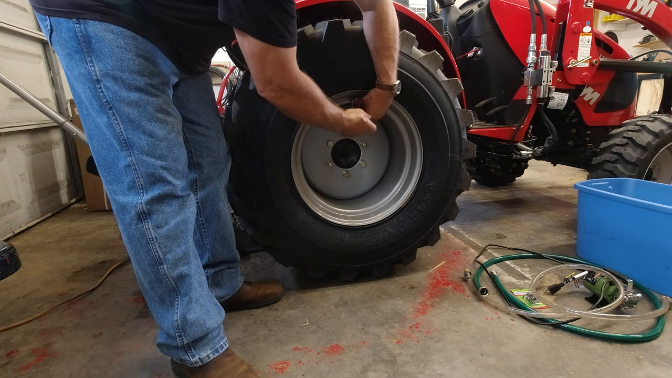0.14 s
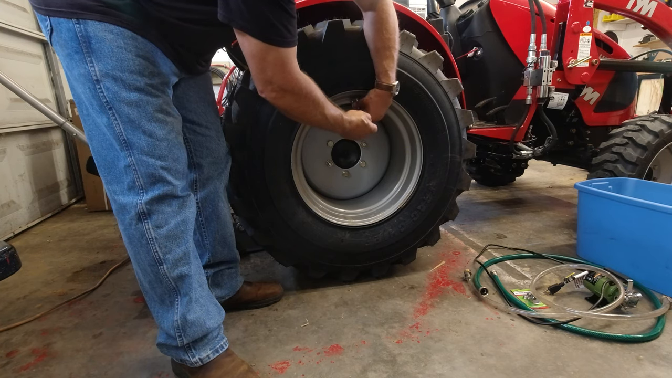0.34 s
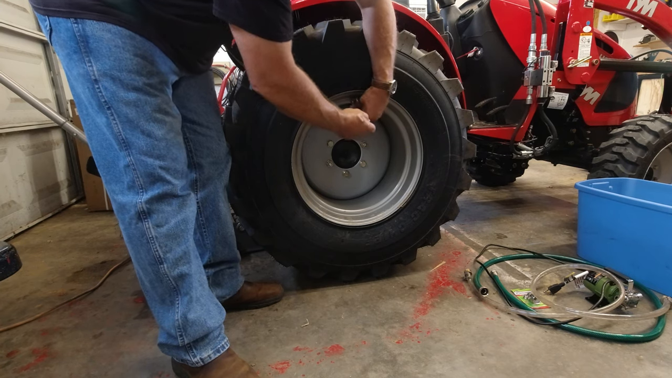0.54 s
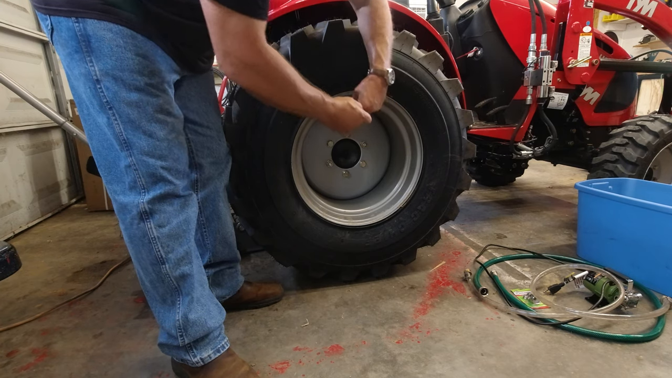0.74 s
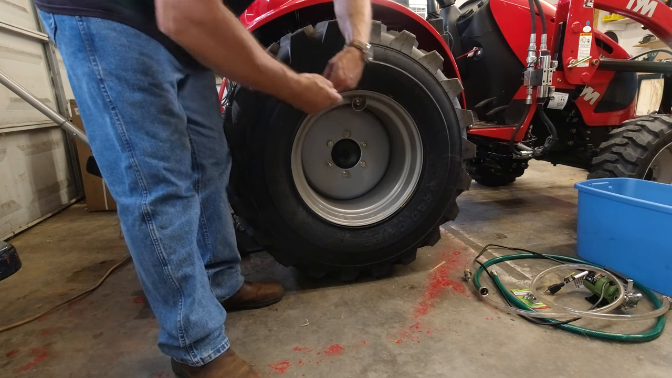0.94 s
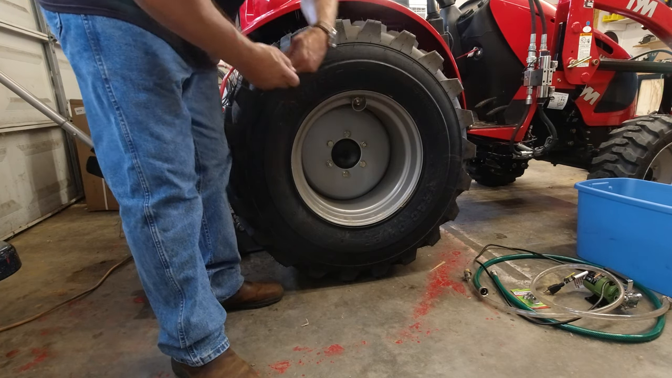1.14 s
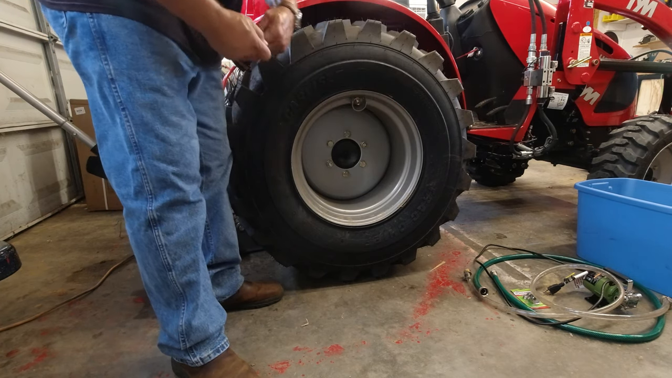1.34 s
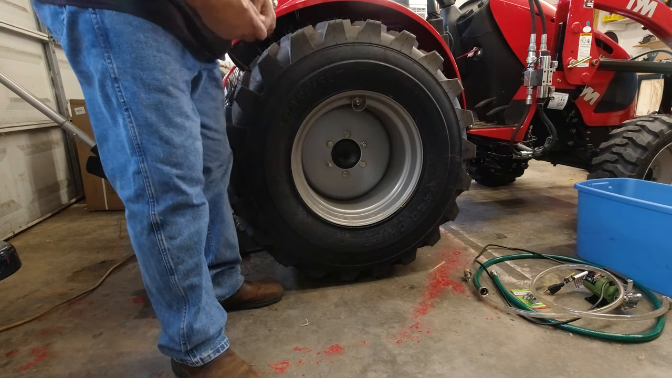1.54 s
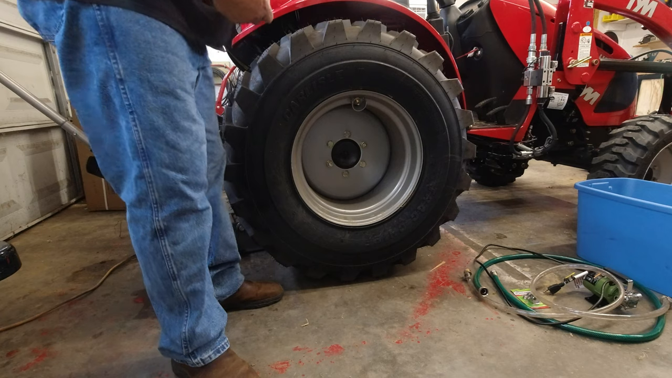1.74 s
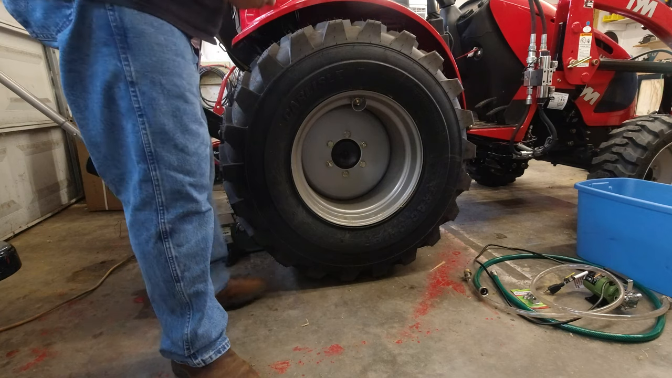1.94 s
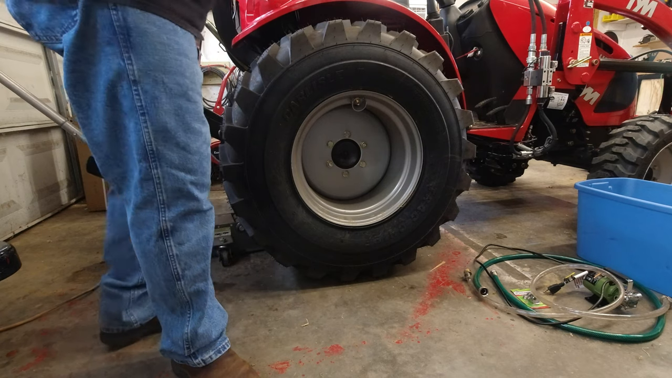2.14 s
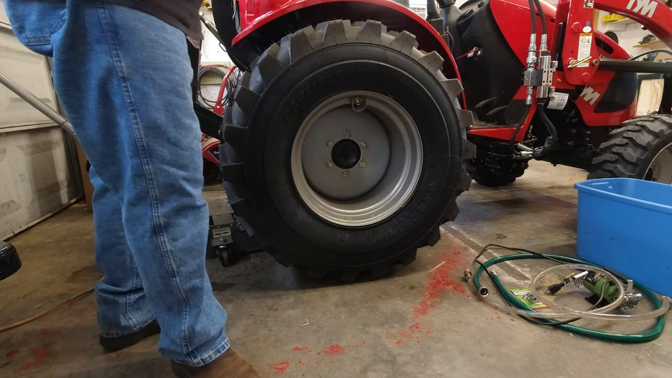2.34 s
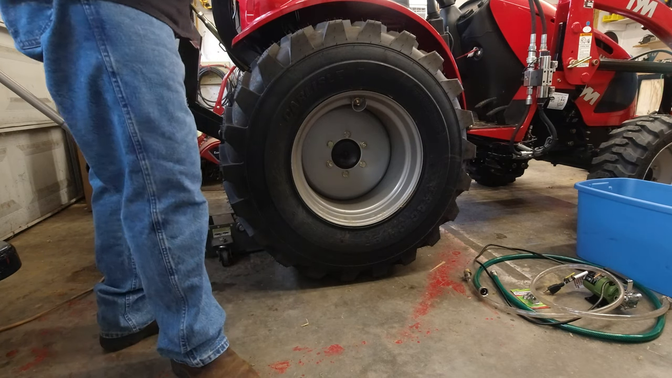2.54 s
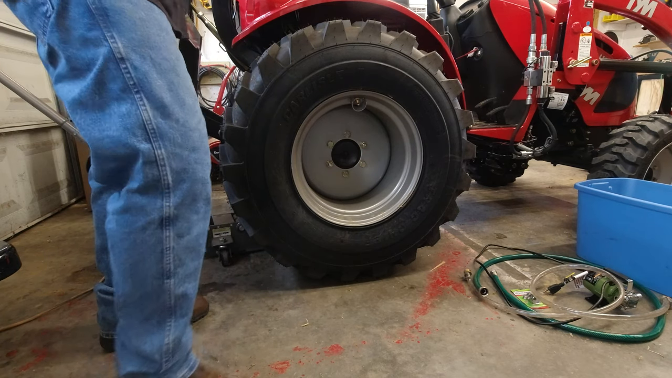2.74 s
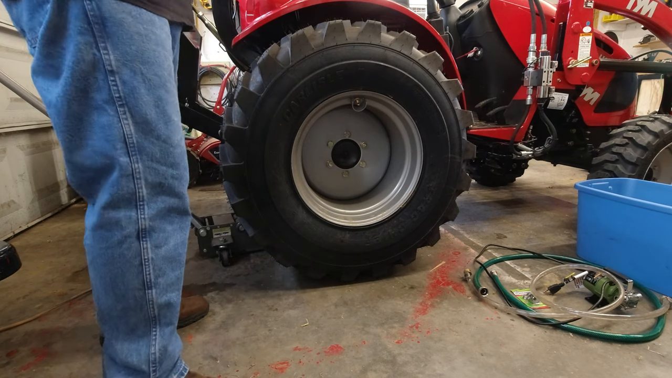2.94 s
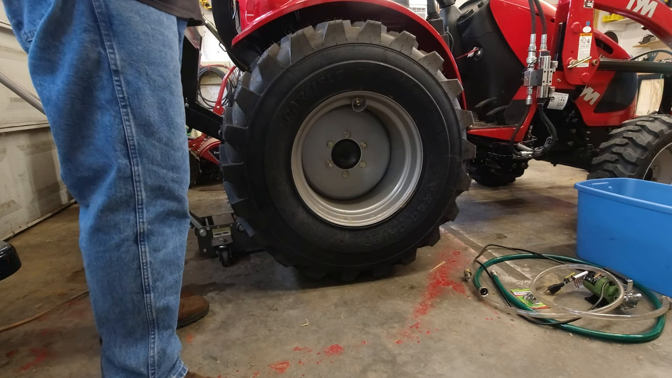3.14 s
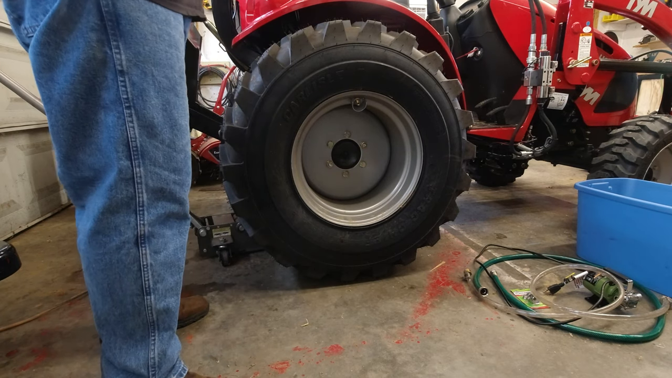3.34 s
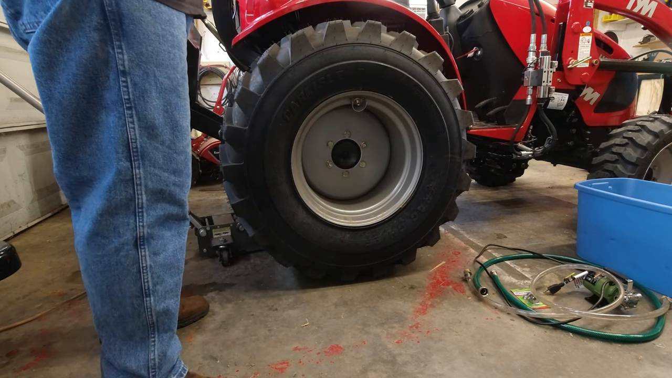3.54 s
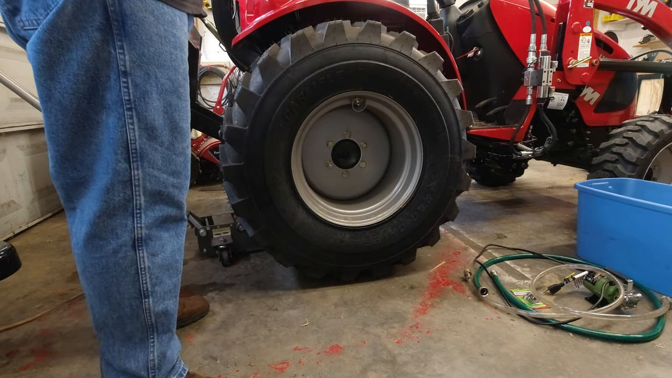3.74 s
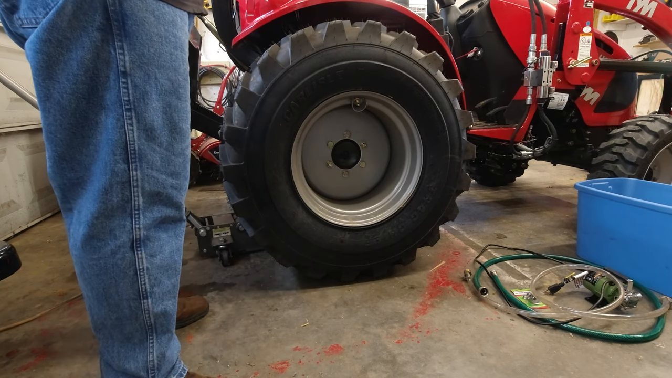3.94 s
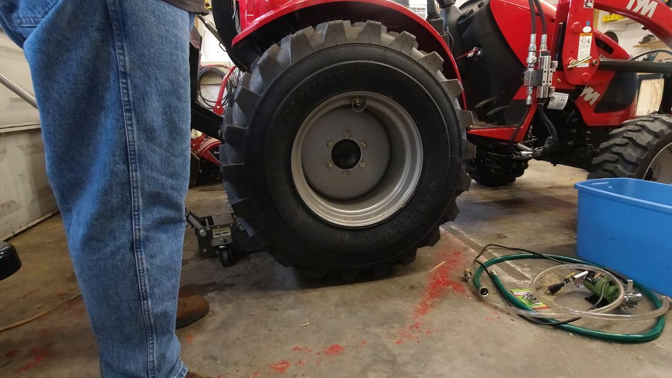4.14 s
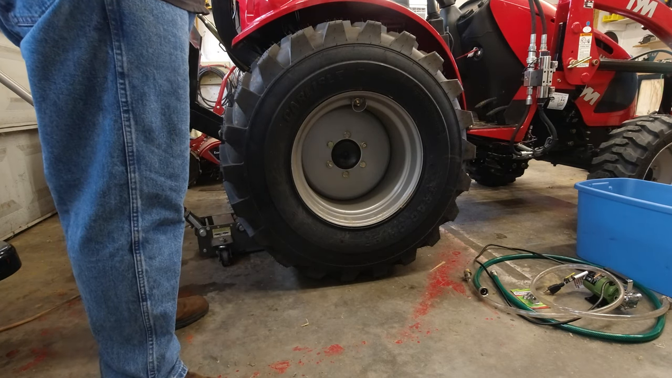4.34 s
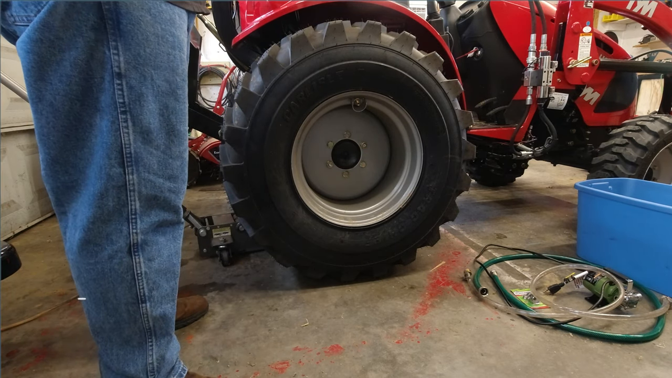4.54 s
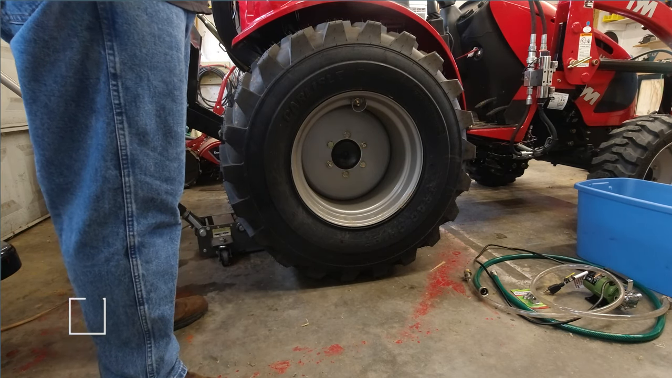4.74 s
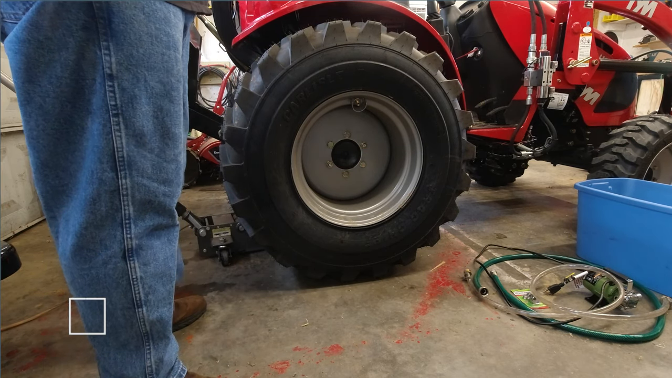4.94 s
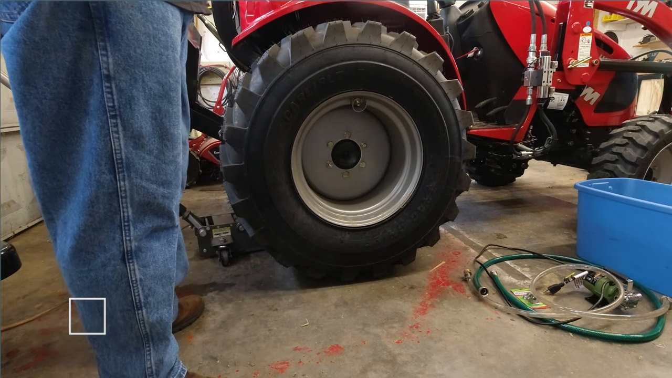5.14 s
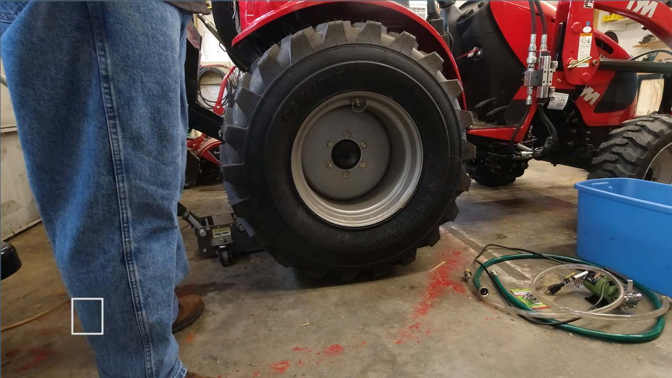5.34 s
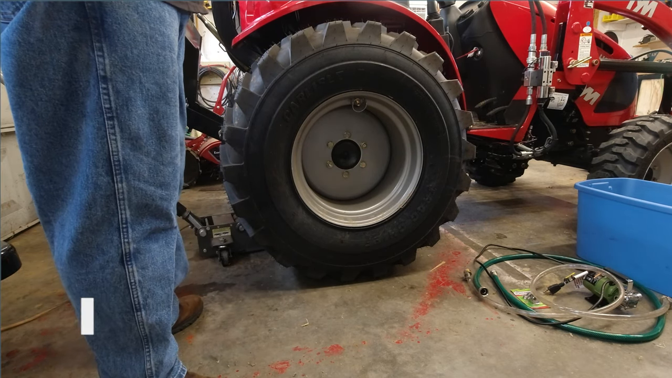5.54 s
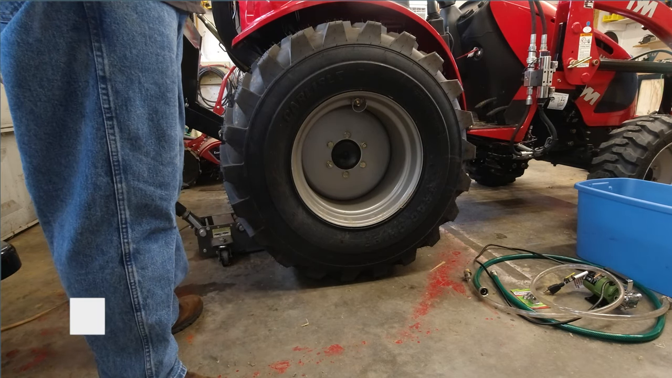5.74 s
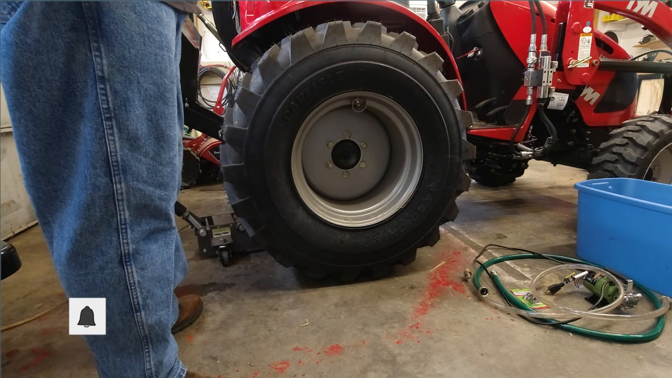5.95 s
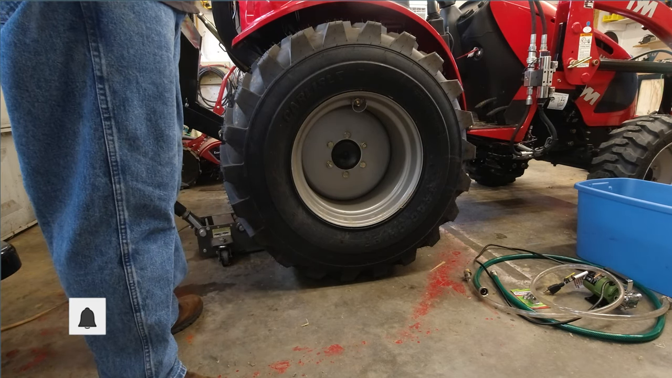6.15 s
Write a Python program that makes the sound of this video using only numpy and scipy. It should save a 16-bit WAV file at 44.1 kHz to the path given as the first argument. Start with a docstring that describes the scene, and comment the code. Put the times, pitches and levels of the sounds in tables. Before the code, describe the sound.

Air seeps faintly for a moment, then rushes out of a big tyre's open valve in a long, loud, metallic-tinged hiss.

```python
"""Tractor tyre let down in a garage

Close by the valve, air seeps past the loosened core between the fingers, a thin hiss of coloured noise.
The core comes out and a full jet hisses from the stem, coloured by the steel rim, and slowly weakens.
The jet's ultrasound overloads each microphone of the pair: a low noise rush that fades faster than the hiss.
Behind it lies the faint noise of the still garage."""
import sys
import numpy as np
from scipy import signal
from scipy.fft import rfft, irfft
from scipy.io import wavfile

SR = 44100
rng = np.random.default_rng(int(sys.argv[2]) if len(sys.argv) > 2 else 0)


def file_out(sig):
    """Save sig as 16-bit WAV at sys.argv[1]."""
    # one column per channel
    cols = np.atleast_2d(sig).T
    # limit, then scale
    lim = np.clip(cols, -1, 1)
    pcm = np.round(lim * 32767).astype(np.int16)
    wavfile.write(sys.argv[1], SR, pcm)


N = 277592
TIME, FREQS = np.arange(N) / SR, np.fft.rfftfreq(N, 1 / SR)  # s, Hz
CORE_OUT = 0.3876  # when the core leaves the stem (s)
LOW_HZ, FIZZ_HZ = 1300, 6200  # where the low band gives way to hiss, and hiss to fizz


def gain_of(db):
    """Decibels to amplitude."""
    return 10 ** (np.asarray(db) / 20)


def evened(x):
    """Scales to an rms of one."""
    return x / np.sqrt(np.mean(x ** 2) + 1e-20)


def read(points):
    """A table over frequency, joined by straight lines on a log axis."""
    hz, value = np.transpose(points)
    return np.interp(np.log(FREQS + 1), np.log(hz + 1), value)


def turbulence(colour_db):
    """Spectrum of coloured eddy noise at two microphones, partly shared."""
    # Likeness of the air's sound at the microphones, long waves reach both alike:
    # (frequency [Hz], left-right correlation [-1 to 1])
    likeness = [(100, .94), (600, 1), (1200, 0.69), (2200, 0.32), (2850, 0.35), (3250, 0.56), (3900, 0.66),
                (4500, 0.31), (5400, 0.72), (6800, 0.68), (7850, 0.15), (8600, 0.39), (10500, 0.46),
                (11900, .68), (15500, 0.49)]
    same = np.clip(read(likeness), -1, 1)
    shared, apart = rfft(rng.standard_normal((2, N)))
    mid = np.sqrt(1 + same) * shared
    side = np.sqrt(1 - same) * apart
    return np.array([mid + side, mid - side]) * gain_of(colour_db)


def garage():
    """The still garage: steady, faint noise, strongest in the bass."""
    # Colour of the room: (frequency [Hz], relative density [dB per Hz])
    room_colour = [(25, 3), (110, 7), (200, -4), (500, -7), (2000, -5), (15000, -20)]
    level_db = -75
    return gain_of(level_db) * evened(irfft(turbulence(read(room_colour)), N))


def ramp(start, length):
    """Goes from zero to one over the given time."""
    return np.clip((TIME - start) / length, 0, 1)


def wander(rate_hz):
    """Random drift of rms one, up to about the given rate."""
    drift = rfft(rng.standard_normal(N)) * (FREQS > 1)
    return evened(irfft(drift / (1 + (FREQS / rate_hz) ** 2), N))


def reflections(wet_db, t60):
    """Response of the direct path plus dying reflections, which ripple the spectrum of a steady hiss."""
    tail = rng.standard_normal(N) * gain_of(-60 * TIME / t60)
    tail = tail * (TIME > 0.002)
    return 1 + gain_of(wet_db) * rfft(tail / np.linalg.norm(tail))


def below(hz):
    """Share of the amplitude that a smooth crossover leaves under hz."""
    return 1 / (1 + (FREQS / hz) ** 8)


def centred(x):
    """Scales a stereo pair so that its middle has an rms of one."""
    return x / np.std(x.mean(0))


def bands(spectrum):
    """Splits a spectrum at the fizz edge into hiss and fizz, each with an rms of one in the middle."""
    hiss_share = below(FIZZ_HZ)
    hiss = centred(irfft(spectrum * hiss_share, N))
    fizz = centred(irfft(spectrum * (1 - hiss_share), N))
    return np.array([hiss, fizz])


def rim_db():
    """The lift that the resonances around the valve give to each frequency of the open jet."""
    # Resonances of the rim dish and the valve: (frequency [Hz], width [Hz], lift [dB])
    resonances = [(2507, 49, 5.5), (2657, 31, 6.5), (2757, 16, 9.5), (3187, 380, 5), (3860, 370, 4.5),
                  (4430, 85, 2.5), (4525, 91, 5.5), (4925, 62, 4.5), (7550, 210, 1), (8400, 91, 2.5),
                  (9960, 200, 1.5), (11150, 250, 0.5)]
    return sum(db / (1 + (2 * (FREQS - hz) / width) ** 2) for hz, width, db in resonances)


def leak():
    """A thin hiss squeezes past the thread of the core and grows as it is turned."""
    # Air squeezing past the core: (frequency [Hz], relative density [dB per Hz])
    leak_colour = [(150, -24), (340, -17), (450, -28), (690, -12), (880, -18.5), (1500, -3.5), (2200, -1),
                   (2750, 1.5), (3350, -3), (3750, 0.5), (4700, 0), (5600, -15.5), (6400, -18),
                   (8400, -18.5), (10000, -15), (12500, -16), (15800, -22)]
    seep_db = -48.5  # hiss past the seated core
    seep_fizz_db, seep_low_db = -7.5, -19  # relative to the hiss
    turn_db, turn_fizz_db = 6, 4.5  # gain of the whole leak, and what the fizz gains on top
    creep_s, creep_db = 0.077, 6

    turned = ramp(0.26, 0.01)  # one turn widens the gap (s, s)
    # On its last thread the core creeps outward: low band and hiss grow, the fizz does not.
    crept = ramp(CORE_OUT - creep_s, creep_s)
    air = turbulence(read(leak_colour) + 0.77 * rim_db())  # the rim lifts the leak less than the jet
    air = air * reflections(wet_db=-5, t60=0.1)
    low_share = below(LOW_HZ)
    low = centred(irfft(air * low_share, N))
    hiss, fizz = bands(air * (1 - low_share))
    body = (low * gain_of(seep_low_db) + hiss) * gain_of(creep_db * crept)
    fizz = fizz * gain_of(seep_fizz_db + turn_fizz_db * turned)
    return (body + fizz) * gain_of(seep_db + turn_db * turned + 0.36 * wander(rate_hz=50))


def surges_db():
    """Lift of the hiss over time: each surge rises quickly and dies away."""
    # The core pops out, the hand sweeps through the jet, a small late surge:
    # (start [s], lift [dB], release [s])
    surges = [(0.387, 2, 0.04), (0.745, 5, 0.095), (4.8, 1.4, 0.2)]
    rise_s = 0.037
    total_db = 0
    for start, lift_db, release in surges:
        fall = np.exp(-np.maximum(TIME - start - rise_s, 0) / release)
        total_db = total_db + lift_db * ramp(start, rise_s) * fall
    return total_db


def sag_db(lost_db, power):
    """The jet weakens ever faster: lost_db is gone 5.62 s after the core came out."""
    return -lost_db * (np.maximum(TIME - CORE_OUT, 0) / 5.62) ** power


def jet():
    """The jet plays on the fingers, then blows free: the stem hisses, the smallest eddies fizz."""
    # The open stem, humped near its quarter-wave and three-quarter-wave resonances:
    # (frequency [Hz], relative density [dB per Hz])
    jet_colour = [(100, -27.5), (700, -19), (1300, -8.5), (2000, 0), (2900, -1.7), (4100, 1.6), (5500, -4),
                  (6900, -8), (8300, -6.5), (10400, -1.5), (11700, -5), (13000, -5.5), (14700, -9.5)]
    # Colour of the jet on the fingers: (frequency [Hz], relative level [dB])
    finger_colour = [(500, 3), (2300, 0.5), (3800, -2.5), (5000, -1.5), (6800, 1), (10000, 3), (12500, 5),
                     (15600, 2.5)]
    hiss_full_db, fizz_full_db = -30.5, -31  # the free jet at full pressure
    fingers_db = -2.4  # how much the fingers damp the hiss

    air = turbulence(read(jet_colour) + rim_db()) * reflections(wet_db=-16.5, t60=0.17)
    free = ramp(0.67, 0.21)  # the fingers leave the jet (s), over this time (s)
    surge = surges_db()
    on_fingers = bands(air * gain_of(read(finger_colour)))
    hiss, fizz = free * bands(air) + (1 - free) * on_fingers
    hiss_db = hiss_full_db + sag_db(2.5, power=2.5) + surge + fingers_db * (1 - free)
    fizz_db = fizz_full_db + sag_db(3, power=4.6) - 0.18 * surge  # fizz dips as the hiss surges
    # Larger eddies waver more, and more slowly.
    hiss = hiss * gain_of(hiss_db + 0.61 * wander(rate_hz=21))
    fizz = fizz * gain_of(fizz_db + 0.37 * wander(rate_hz=44))
    return hiss + fizz


def overload():
    """Ultrasound beats with itself in each microphone; noise stands for the unrelated difference tones."""
    # Difference tones: (frequency [Hz], relative density [dB per Hz])
    rush_colour = [(25, -15), (140, -2.5), (500, -1.8), (1100, -1.3), (2000, 0), (4000, -17), (8000, -15.5),
                   (15000, -23)]
    rush_full_db = -42.3  # the part under LOW_HZ, at full pressure
    beats = rfft(rng.standard_normal((2, N))) * gain_of(read(rush_colour))
    low_rms = np.std(irfft(beats * (FREQS < LOW_HZ), N).mean(0))
    rush_db = rush_full_db + sag_db(8, power=2.28) + 1.23 * wander(rate_hz=9.5)
    return irfft(beats, N) / low_rms * gain_of(rush_db)


def scene():
    """The leak gives way to the jet as the core clears the stem, over the still garage."""
    opened = ramp(CORE_OUT, 0.018)  # time to clear (s)
    return garage() + (1 - opened) * leak() + opened * (jet() + overload())


def record(dry):
    """The recorder's band limit, a steep low-pass filter."""
    edge_hz = 15760
    low_pass = signal.firwin(1023, edge_hz, window=("kaiser", 9), fs=SR)
    return signal.oaconvolve(dry, low_pass[None], "same")


dry = scene()
out = record(dry)
file_out(out)
```